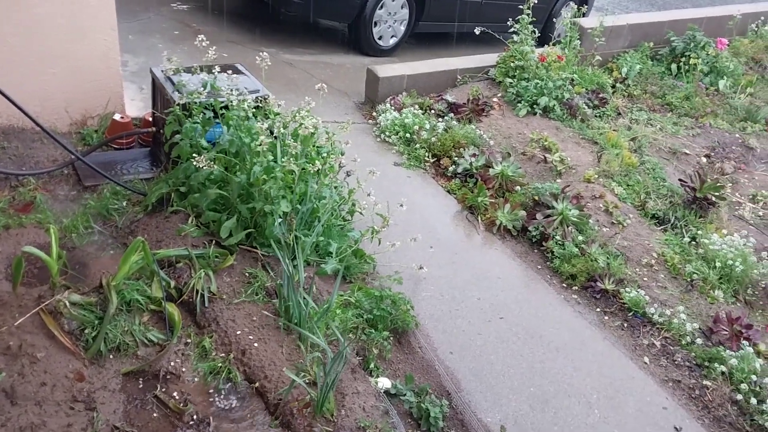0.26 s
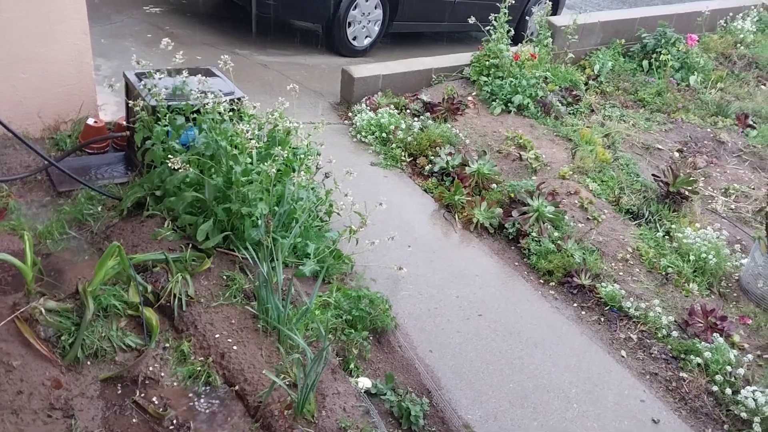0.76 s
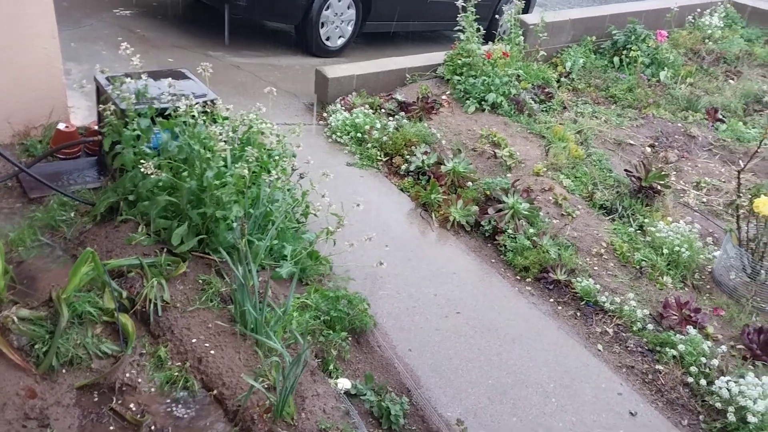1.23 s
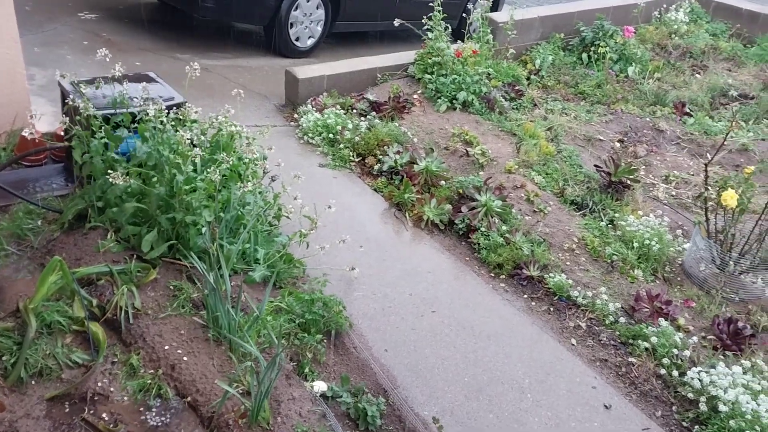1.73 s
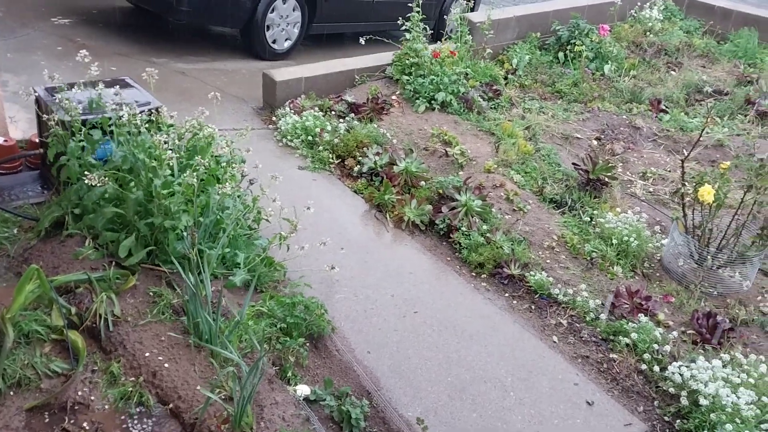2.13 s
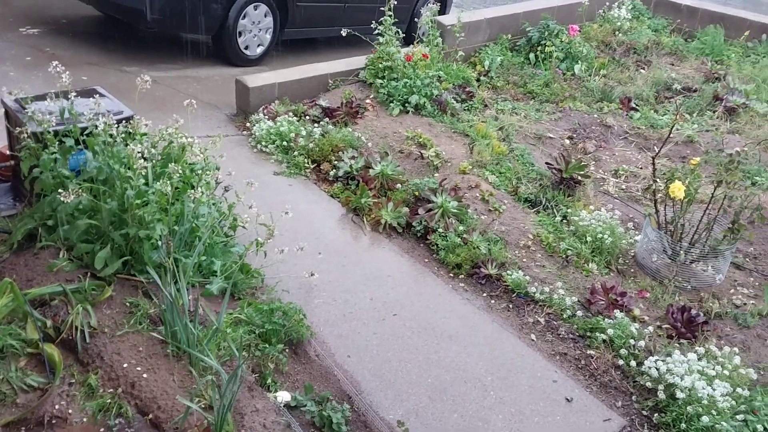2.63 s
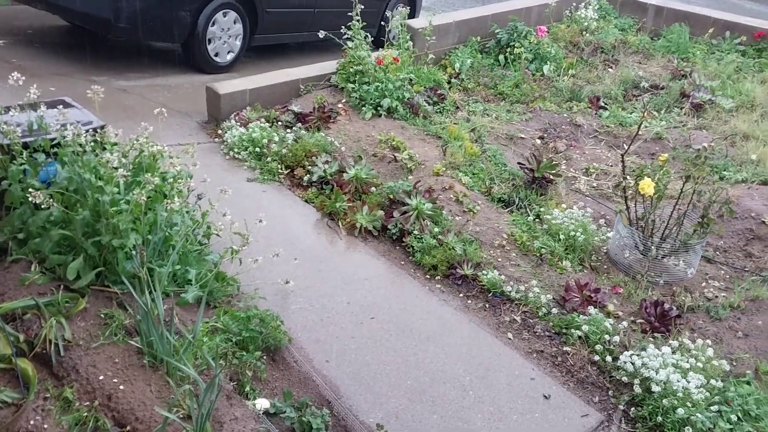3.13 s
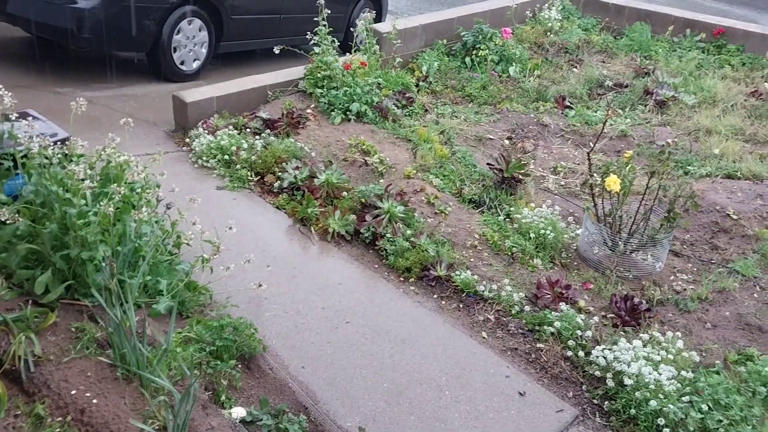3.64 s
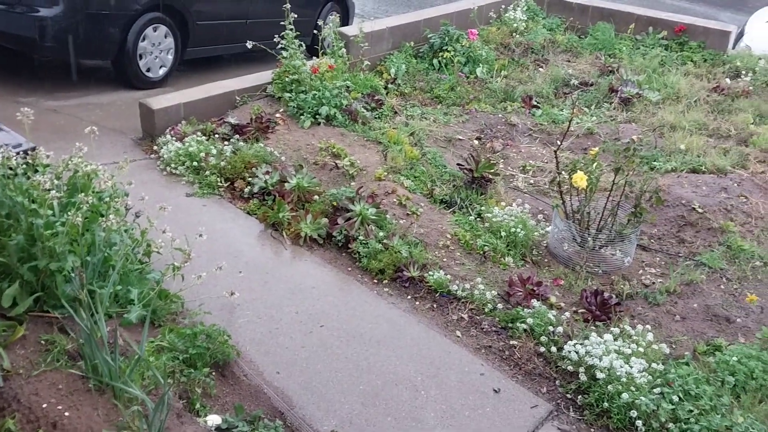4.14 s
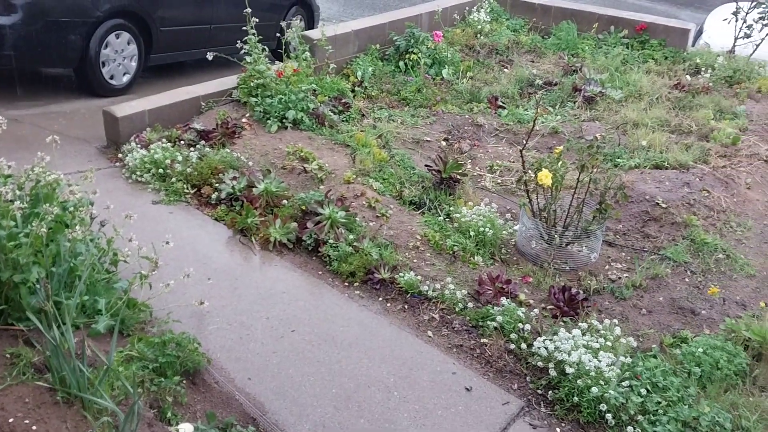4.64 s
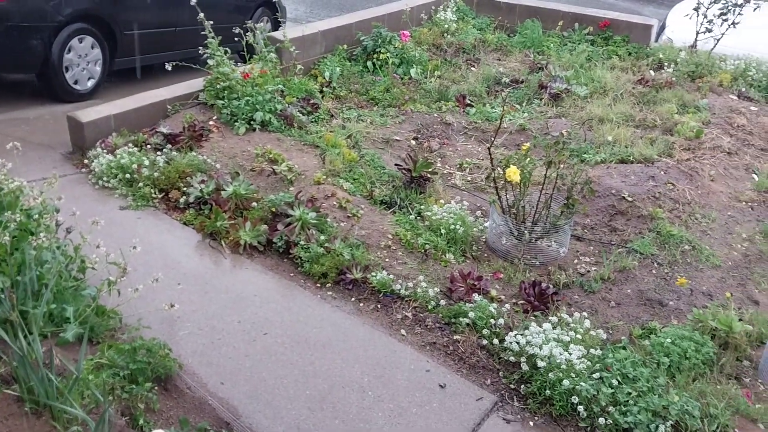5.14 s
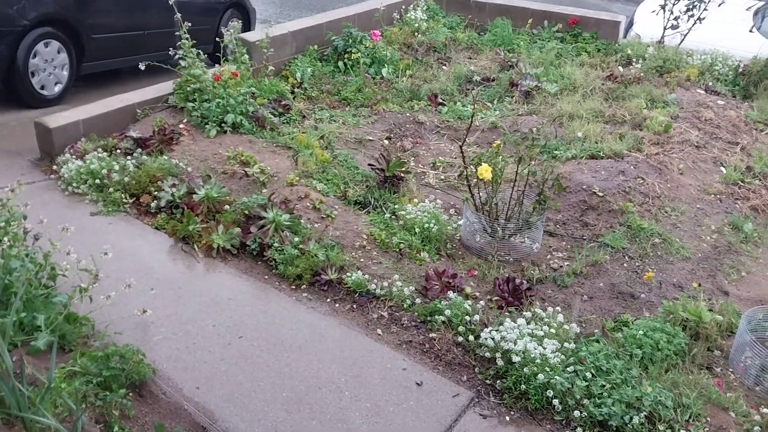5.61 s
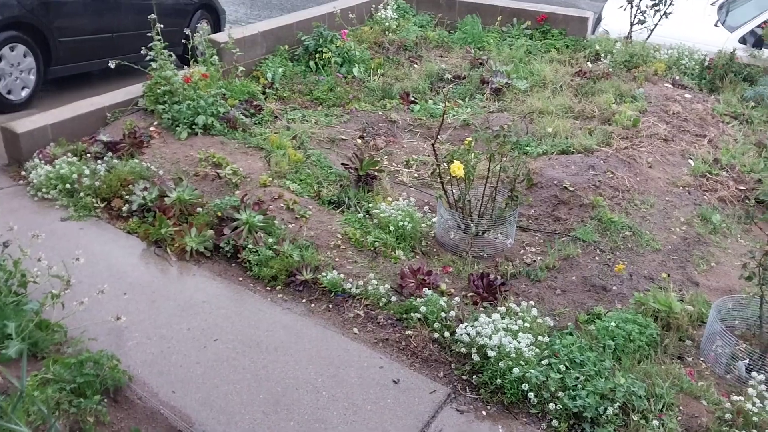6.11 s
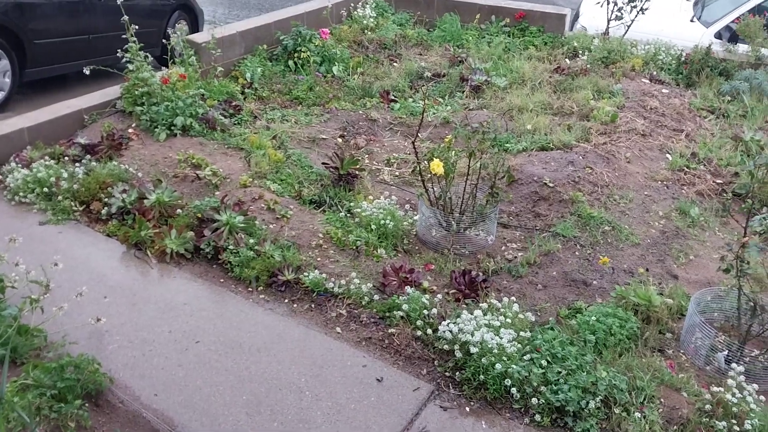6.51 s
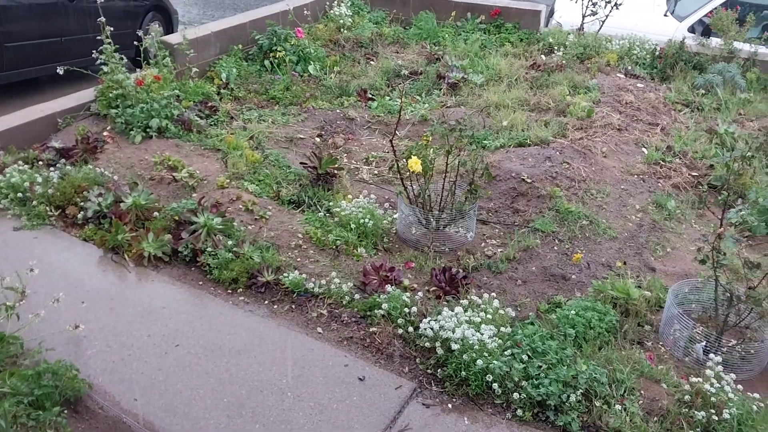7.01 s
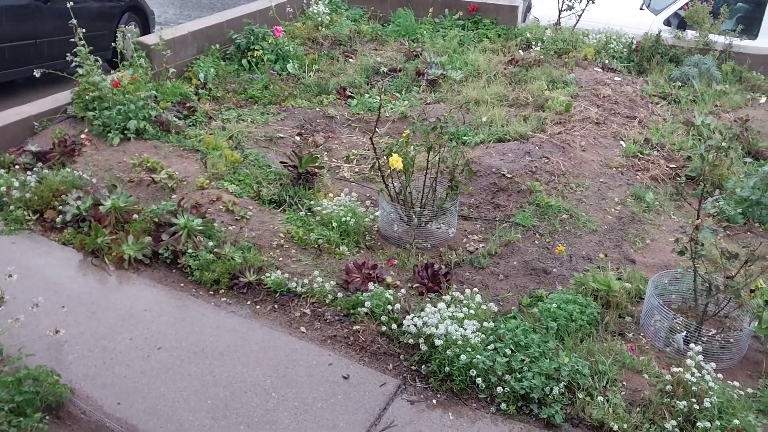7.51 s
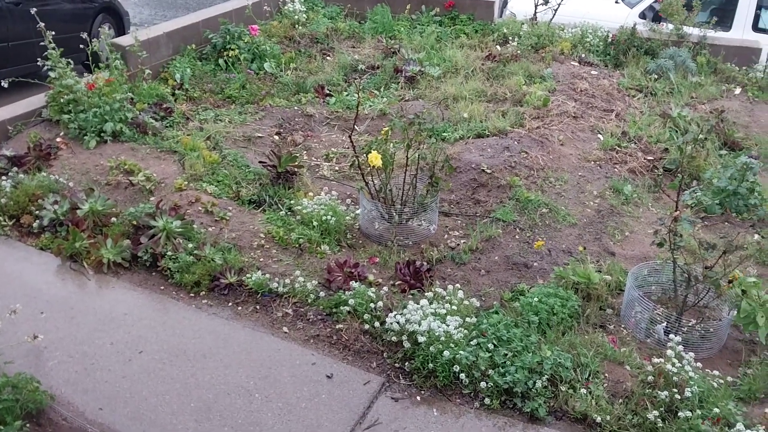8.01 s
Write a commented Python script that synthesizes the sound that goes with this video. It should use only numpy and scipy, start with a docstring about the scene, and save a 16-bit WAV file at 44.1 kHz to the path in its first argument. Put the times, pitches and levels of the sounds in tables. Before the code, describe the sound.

Steady rain hisses over a garden with crisp drop ticks close by, wind thumping the microphone early, then quieter over a low street rumble.

```python
"""Steady rain on a garden; after a loud gust the camera's automatic gain, a drawn level curve, turns it down,
then partly recovers. It is heard from under the eaves by a hand-held camera with two microphone ports.
Near drops splat on soil, leaves and concrete: coloured cracks with echoes off the wall and a noise spray.
Drips ring as sines in a puddle; far rain is a noise wash over a low rumble, and once a faint hum swells.
Gusts thump in each port as bass noise of its own."""
import sys
import numpy as np
from scipy import signal
from scipy.fft import rfft, irfft
from scipy.io import wavfile
from scipy.ndimage import uniform_filter1d

SR = 44100
rng = np.random.default_rng(int(sys.argv[2]) if len(sys.argv) > 2 else 0)


def to_linear_factor(level_db):
    """Convert decibel levels (scalar or array-like) to linear amplitude factors."""
    exponent = np.asarray(level_db, float) / 20
    return 10 ** exponent


def store_pcm(level_fs):
    """Save levels as 16-bit WAV."""
    pcm = np.round(np.clip(level_fs, -1, 1) * 32767).astype(np.int16)
    wavfile.write(sys.argv[1], SR, np.atleast_2d(pcm).T)


N = 364266  # samples

# level of the rain as the camera's gain sets it, before each layer's own offset: time_s, level_db
RAIN_LEVEL = [(0, -38.5), (.94, -40.5), (1.2, -46.5), (2.2, -47.5), (2.5, -43.5), (8.26, -44)]
# colour of rain on the garden: frequency_hz, relative_level_db
RAIN_COLOUR = [(350, -43), (650, 10.5), (900, 11), (1240, 8), (1850, 10.5), (2740, -1), (5600, 2),
               (7700, 2), (8200, -9), (9800, -4), (12500, 3.5), (15900, -2)]
# how alike far sound is at the two ports: frequency_hz, correlation (0 to 1)
PORT_LIKENESS = [(60, 1), (300, 0.86), (1300, 0.54), (2400, 0.15), (15000, 0.021)]
# near drops lean right until the camera turns: time_s, left_over_right_db
LEAN = [(.99, -5), (1.2, -0.1)]
LEAD_S = .00035  # far rain reaches the left port this much earlier


def evened(x):
    """Scales to rms 1."""
    return x / np.sqrt(np.mean(x ** 2) + 1e-20)


def read(points, hz):
    """Reads a spectrum on a log-frequency axis."""
    f, value = np.transpose(points)
    return np.interp(np.log(hz + 1), np.log(f + 1), value)


def curve(rows, axis):
    """One column of a table, sample by sample."""
    rows = np.array(rows)
    return np.interp(np.arange(N) / SR, rows[:, 0], rows[:, axis])


def hiss(spectrum, same, lead_s, size, patchy_db, patch_s, patch_hz, calm_hz=0):
    """Random short-time spectra with drifting patches (fainter below calm_hz), partly shared by both ports."""
    frames, hz = 4 * N // size + 5, np.fft.rfftfreq(size, 1 / SR)
    a, b, c, d, patches = rng.standard_normal((frames, len(hz), 5)).T
    # smooth the patches over frequency, then over time
    patches = uniform_filter1d(patches, max(1, round(patch_hz * size / SR)), 0)
    patches = evened(uniform_filter1d(patches, max(1, round(4 * patch_s * SR / size)), 1))
    same = np.clip(read(same, hz), -1, 1)[:, None]
    left = a + 1j * b
    late = np.exp(-2j * np.pi * hz * lead_s)[:, None]
    right = same * late * left + np.sqrt(1 - same ** 2) * (c + 1j * d)
    z = np.array([left, right])
    patch_depth_db = patchy_db * ((hz + 1) / (hz + 1 + calm_hz))[:, None]
    z *= to_linear_factor(read(spectrum, hz)[:, None] + patch_depth_db * patches)
    return evened(signal.istft(z, nperseg=size, noverlap=3 * size // 4)[1][:, :N])


def splat(hz, tail_db, tail_s, sharp=3.4, wide_db=-7, low_hz=1100, crack_s=.0004):
    """A sub-millisecond crack around hz that peaks at 1, its echoes and a spray that falls 60 dB in tail_s."""
    # wall, ground and eaves: delay_s, level_db
    echoes = [(.0056, -8), (.011, -17), (.017, -20)]
    f, t = np.fft.rfftfreq(4096, 1 / SR), np.arange(4096) / SR
    colour = np.exp(-(sharp * np.log((f + 1) / hz)) ** 2) + to_linear_factor(wide_db)
    colour = colour * to_linear_factor(read(RAIN_COLOUR, f))
    colour = colour / (1 + (np.sqrt(low_hz * hz) / (f + 1)) ** 6)  # little below the drop's own colour
    burst = ((t == 0) + .55 * rng.standard_normal(len(t))) * np.exp(-t / crack_s)
    crack = rfft(np.roll(burst, 88))  # 88 samples leave room ahead of the crack
    colour = colour * crack / uniform_filter1d(abs(crack), size=120)  # ragged in time, even in colour
    taps = np.zeros((2, len(t)))
    taps[:, 0] = 1
    for s, db in echoes:
        # each port hears the echo up to 0.86 ms later, with either sign
        lag = np.round((s + 0.00086 * rng.random(2)) * SR).astype(int)
        taps[[0, 1], lag] = to_linear_factor(db) * rng.choice([-1, 1], 2)
    spray = rng.standard_normal(taps.shape) * (1 - np.exp(-t / .002)) * to_linear_factor(-60 * t / tail_s)
    taps += to_linear_factor(tail_db) * spray
    return irfft(rfft(taps) * colour) / abs(irfft(colour)).max()


def add(mix, s, sound, pan_db):
    """Places a sound, left over right by pan_db; the quieter port gets it a little later."""
    lag_s_per_db = .00007
    for port, part, side in zip(mix, sound, (.5, -.5)):
        start = max(0, round((s - side * pan_db * lag_s_per_db) * SR))
        room = port[start:][:len(part)]
        room += to_linear_factor(side * pan_db) * part[:len(room)]


def dry_ticks():
    """The largest drops close by land on something hard: a short crack and a faint spray."""
    # drops on hard ground, level ahead of the lean: time_s, crack_peak_db, centre_hz
    drops = [(0.0543, -10.5, 8900), (0.159, -13, 14800), (0.2294, -16, 12100), (0.3137, -14, 13800),
             (0.3541, -11, 13100), (0.4234, -17, 12400), (0.6918, -13, 15200), (0.8111, -21, 6200),
             (0.8754, -11, 4960), (0.917, -13.5, 3120), (0.9847, -8.5, 14100), (1.4043, -19, 14800),
             (2.7357, -14, 6150), (2.7528, -10.5, 5300), (2.888, -14, 4830), (3.1607, -17.3, 10900),
             (3.2065, -18.5, 9000), (3.3437, -12, 5450), (3.3933, -5, 14800), (3.4201, -16.5, 4580),
             (3.5548, -13.5, 5100), (3.5635, -19.5, 14500), (3.7175, -13, 8600), (4.1749, -24, 11000),
             (4.3321, -16.5, 9100), (4.561, -19, 11700), (4.5963, -18, 3200), (4.6528, -21.5, 6200),
             (4.8868, -20, 12700), (5.1153, -14, 13100), (5.255, -26, 12400), (5.665, -10, 13600),
             (5.7652, -1.5, 15500), (6.2392, -12, 4060), (6.2682, -5.5, 9260), (6.3368, -21, 14100),
             (6.5715, -14, 6430), (6.7366, -19, 13400), (7.0682, -12.5, 15200), (7.7164, -19, 9000),
             (7.7393, -18, 13400), (8.0481, -17, 9500), (8.114, -22, 3150), (8.1587, -16, 15200)]
    when, lean_db = np.transpose(LEAN)
    out = np.zeros((2, N))
    for s, db, hz in drops:
        tick = to_linear_factor(db) * splat(hz, tail_db=-27, tail_s=0.12)
        add(out, s - .0007, tick, np.interp(s, when, lean_db))
    return out


def wet_bursts():
    """Fat drops close by burst on wet soil: a longer, broader crack and a stronger spray."""
    # drops on wet soil, level ahead of the lean: time_s, crack_peak_db, centre_hz
    splashes = [(0.657, -21.5, 3400), (0.7596, -19.5, 4500), (1.2485, -26, 4160), (1.8307, -24, 3760),
                (2.876, -22, 4860), (3.3627, -19, 4300), (3.9125, -21, 3620), (3.9793, -25, 4330),
                (4.0606, -21.5, 7300), (4.581, -14, 12800), (5.2805, -22.5, 6200), (5.4482, -21.5, 7190),
                (5.852, -24, 4870), (6.069, -21, 7200), (6.436, -12.5, 3770), (6.4936, -16.5, 2700),
                (6.8652, -17.5, 6300), (7.3096, -18.5, 3100), (7.7864, -19.5, 5470)]
    when, lean_db = np.transpose(LEAN)
    out = np.zeros((2, N))
    for s, db, hz in splashes:
        burst = splat(hz, tail_db=-21, tail_s=0.11, sharp=2.6, wide_db=-11, crack_s=.0008)
        add(out, s - .0007, to_linear_factor(db) * burst, np.interp(s, when, lean_db))
    return out


def patter(per_s=160, spread_db=5, over_db=7, clump_db=6.0, count=32):
    """Many smaller drops in count colours, at random times that clump; per_s is the rate before clumping."""
    out = np.zeros((2, N))
    clumps = to_linear_factor(clump_db * evened(uniform_filter1d(rng.standard_normal(N), size=900)))
    for hz in np.geomspace(2800, 15500, count):
        size = to_linear_factor(spread_db * np.minimum(rng.exponential(1, N), 2.2))
        size = size * (rng.random(N) < clumps * per_s / count / SR)
        right_lag = round(2 * LEAD_S * SR * rng.random())
        train = np.array([size, np.roll(size, right_lag)])
        drop = splat(hz, tail_db=-20, tail_s=.045, sharp=3, wide_db=-11, crack_s=.0002)
        out += signal.oaconvolve(train, drop, axes=1)[:, :N]
    return to_linear_factor(over_db + curve(RAIN_LEVEL, axis=1)) * out


def plops(ring_cycles=75, per_s=30, small_db=-56, rough=.4):
    """Drips trap bubbles that ring unevenly, down 60 dB in ring_cycles, so high ones are shortest."""
    # clear drips in a puddle, level before roughness and pan: time_s, peak_db, pitch_hz
    clear = [(0.9283, -29.5, 1616), (2.4166, -35, 1760), (2.862, -39, 1710), (3.3237, -38.5, 1765),
             (3.6537, -40, 1690), (3.9085, -37, 1830), (3.9843, -37, 1960), (5.198, -38, 2090),
             (6.129, -40, 1910), (7.2666, -39, 1780), (7.665, -41.5, 1017), (7.849, -30, 3600)]
    out, t = np.zeros((2, N)), np.arange(4000) / SR
    # faint drips between the clear ones, up to 7 dB over small_db and 1600 to 2250 Hz
    faint = rng.random((round(per_s * N / SR), 3)) * [N / SR, 7, 650] + [0, small_db, 1600]
    for s, db, hz in [*clear, *faint]:
        swell = (1 - np.exp(-t / 0.004)) * to_linear_factor(-60 * t * hz / ring_cycles)
        uneven = 1 + rough * evened(uniform_filter1d(rng.standard_normal(len(t)), size=90))
        swell = swell / swell.max() * uneven / np.hypot(1, rough)
        ring = to_linear_factor(db) * np.sin(2 * np.pi * hz * t) * swell
        add(out, s, [ring, ring], pan_db=-1.0)
    return out


def wash():
    """Far rain on the whole garden: countless drops merge into patchy noise."""
    far = hiss(RAIN_COLOUR, PORT_LIKENESS, LEAD_S, size=512,
               patchy_db=5.6, patch_s=.012, patch_hz=5000, calm_hz=1500)
    return to_linear_factor(curve(RAIN_LEVEL, axis=1) + [[1.5], [2.2]]) * far  # offsets left, right in dB


def wind(steady=0.26, roar_db=7):
    """Low buffeting, almost unrelated in the two ports; hard gusts also roar higher up."""
    # thump of air in a port: frequency_hz, relative_level_db
    buffet = [(30, -24), (60, 4), (80, -2), (108, 4.5), (150, -6), (220, -7), (330, -52.5)]
    # roar of hard gusts: frequency_hz, relative_level_db
    roar_colour = [(100, -9), (200, 6.5), (350, -6), (600, -20.5), (1300, -50)]
    port_hz = 44.3  # the ports pass little wind below this
    level_db = wind_db()
    lumps = hiss(buffet, [(1, 0.24)], 0, size=2048, patchy_db=1.5, patch_s=0.036, patch_hz=60)
    # the cavity swings steadily
    lumps = evened(lumps / uniform_filter1d(lumps ** 2, 1300, axis=1) ** (steady / 2))
    high_pass = signal.butter(2, port_hz, "high", fs=SR, output="sos")
    lumps = signal.sosfilt(high_pass, to_linear_factor(level_db) * lumps)
    roar = hiss(roar_colour, [(1, 0.0082)], 0, size=512, patchy_db=3.0, patch_s=.008, patch_hz=600)
    return lumps + to_linear_factor(2 * level_db + roar_db) * roar  # the roar grows twice as fast in dB


def wind_db():
    """Strength at each port: the breeze, and over it each gust rising fast, holding and dropping away."""
    # light wind under the gusts, as the right port gets it: time_s, level_db
    breeze = [(0, -43.5), (1.1, -42.5), (1.9, -47), (2.1, -58), (5.0, -57), (5.3, -44.5), (6.0, -48),
              (6.3, -58), (6.65, -55), (6.8, -38.5), (7.9, -46), (8.26, -49.5)]
    # gusts that strike the ports: start_s, length_s, left_db, right_db
    gusts = [(0.03, 0.37, -30, -46), (0.11, 0.047, -23, -55), (0.484, 0.038, -36, -31.5),
             (0.59, 0.021, -18, -37), (0.62, 0.12, -25, -40), (0.675, 0.0091, -16.5, -42),
             (0.789, 0.066, -16.5, -45), (0.898, 0.083, -32.5, -29.5), (1.016, 0.036, -14, -24),
             (1.065, 0.056, -21, -42), (1.118, 0.0073, -38, -20.5), (1.342, 0.043, -51, -34.5),
             (1.474, 0.025, -46, -29), (1.539, 0.0079, -25, -52), (1.675, 0.047, -32.5, -34.5),
             (1.944, 0.045, -35, -32), (2.407, 0.036, -44, -39.5), (5.595, 0.036, -37, -34),
             (6.94, 0.02, -30, -30)]
    rise_db_per_s, fall_db_per_s, breeze_left_db = 702, 900, -3
    t = np.arange(N) / SR
    power = to_linear_factor(2 * (curve(breeze, axis=1) + [[breeze_left_db], [0]]))
    for start, length, *db in gusts:
        before, after = np.maximum(start - t, 0), np.maximum(t - start - length, 0)
        away_db = rise_db_per_s * before + fall_db_per_s * after
        power = power + to_linear_factor(2 * (np.array(db)[:, None] - np.minimum(away_db, 100)))
    return 10 * np.log10(power)


def rumble():
    """Low roar of the wet street, near the same in both ports; the camera's gain moves it in part."""
    # colour of the street: frequency_hz, relative_level_db
    street = [(40, -9), (65, -2), (130, -6), (204, 0.5), (355, -2), (620, -11), (1000, -22.5)]
    # follows: dB of rumble per dB of change in the rain's recorded level
    base_db, follows, settled_db = -43.5, 0.43, -43.5
    low = hiss(street, PORT_LIKENESS, 0, size=1024, patchy_db=3.0, patch_s=.06, patch_hz=300)
    level_db = base_db + follows * (curve(RAIN_LEVEL, axis=1) - settled_db)
    return to_linear_factor(level_db + [[-.4], [.3]]) * low


def lulls(low):
    """Fades the left port over to a version without bass during each lull."""
    # moments when the bass falls away in the left port: start_s, length_s
    moments = [(1.172, 0.073), (1.302, 0.06), (1.423, 0.067), (1.984, 0.1), (2.244, 0.116), (2.634, 0.088),
               (6.56, 0.12)]
    below_hz, edge_s = 370, 0.016
    t = np.arange(N) / SR
    gone = sum(np.clip(np.minimum(t - s, s + length - t) / edge_s + .5, 0, 1) for s, length in moments)
    thin = signal.sosfiltfilt(signal.butter(2, below_hz, "high", fs=SR, output="sos"), low[0])
    return np.array([low[0] + gone * (thin - low[0]), low[1]])


def hum():
    """A faint soft tone that swells once, sags in pitch and flutters, the same in both ports."""
    # level before flutter: middle_s, width_s, peak_db, pitch_hz at the middle, sag_hz_per_s
    s, width, db, hz, sag = (5.37, .07, -41, 378, 450)
    flutter = 1 + .5 * evened(uniform_filter1d(rng.standard_normal(N), size=500))
    t = np.arange(N) / SR - s
    tone = np.sin(2 * np.pi * (hz - sag * t / 2) * t)
    return to_linear_factor(db) * flutter * np.exp(-(t / width) ** 2) * tone


def scene():
    """Rain near and far, puddle, wind, rumble and hum."""
    near = dry_ticks() + wet_bursts() + patter() + plops()
    return near + wash() + lulls(wind() + rumble()) + hum()


def top_cut(x):
    """Nothing passes above the cut-off."""
    return signal.sosfilt(signal.butter(12, 16980, fs=SR, output="sos"), x)


def record(dry):
    """The camera's band limit: little passes above 15950 Hz."""
    low_pass = signal.firwin(255, 15950, fs=SR)
    limited = signal.oaconvolve(dry, low_pass[None], "same")
    return top_cut(limited)


dry = scene()
out = record(dry)
store_pcm(out)
```